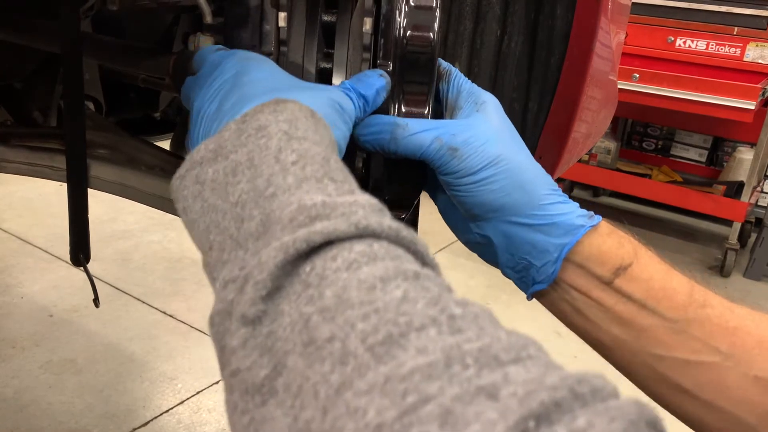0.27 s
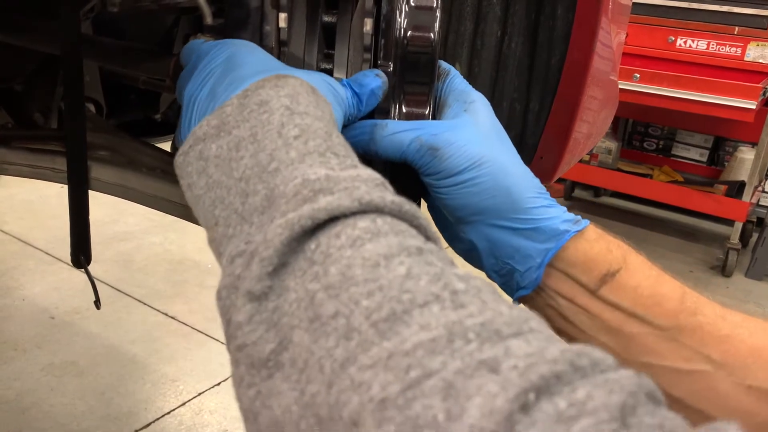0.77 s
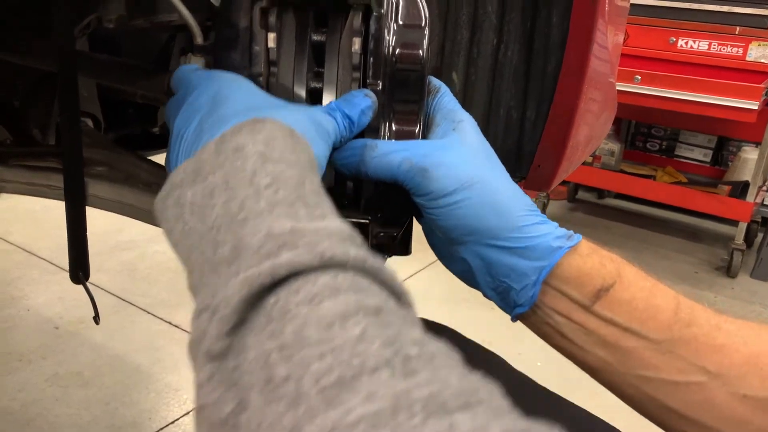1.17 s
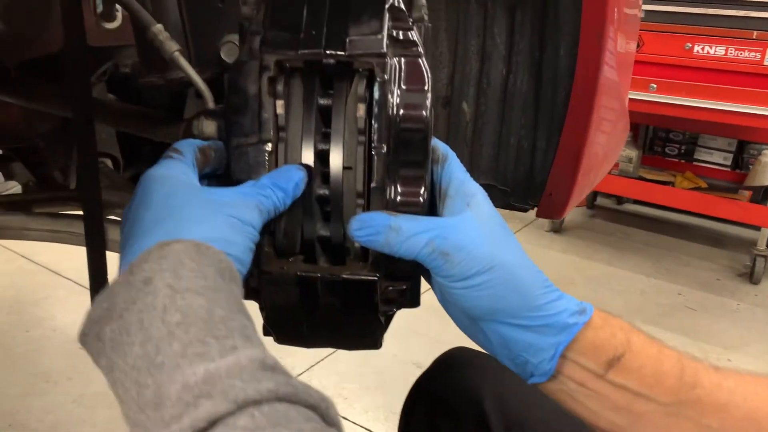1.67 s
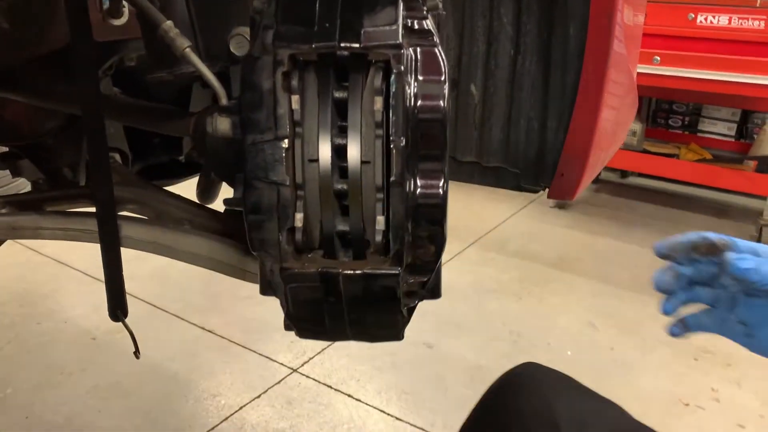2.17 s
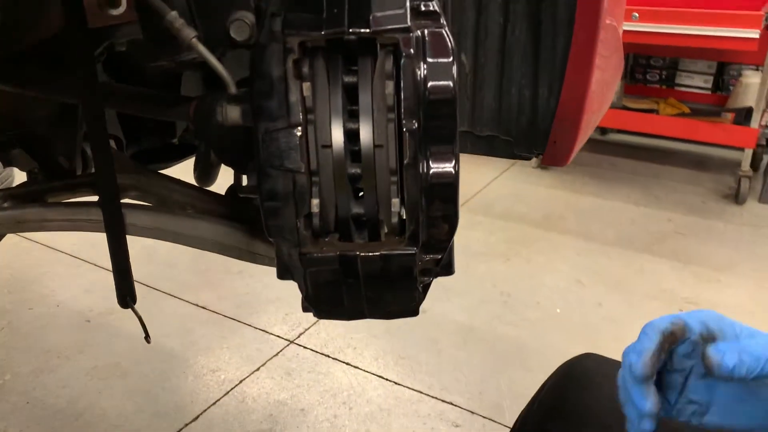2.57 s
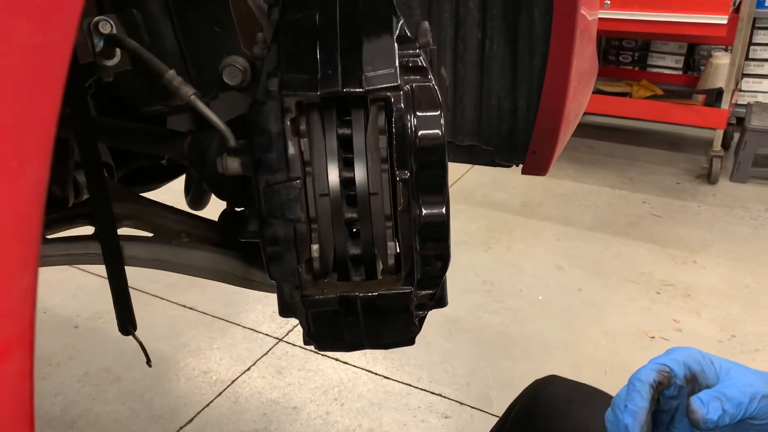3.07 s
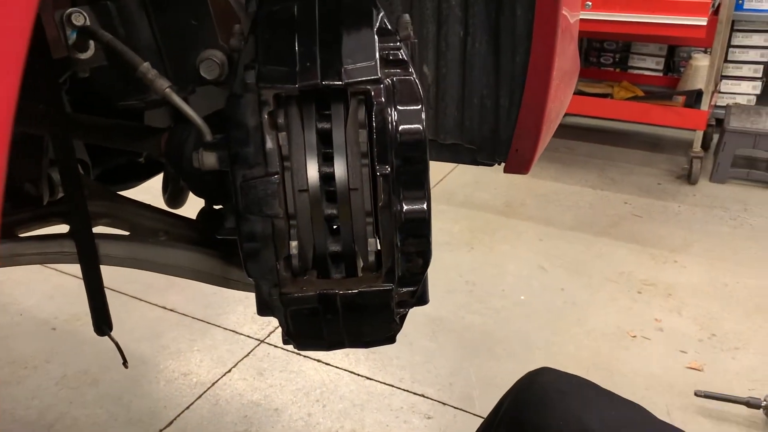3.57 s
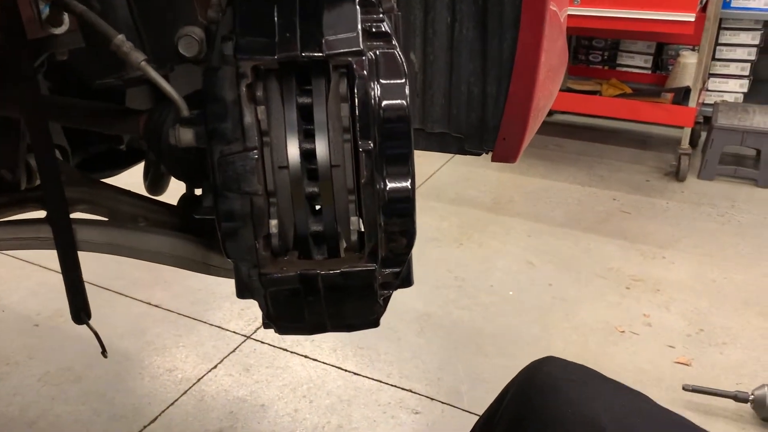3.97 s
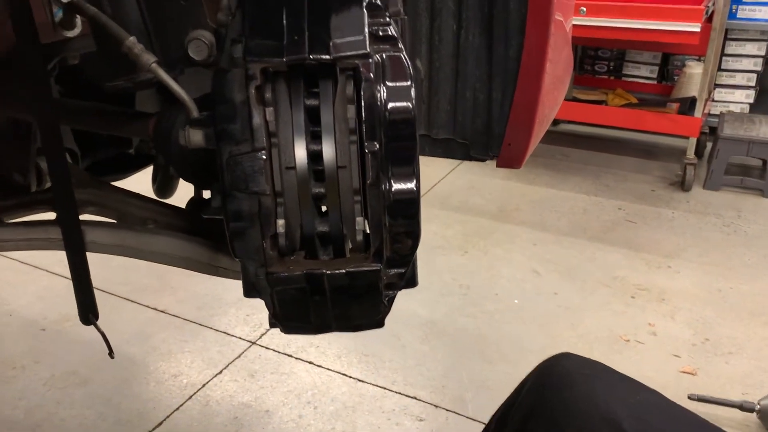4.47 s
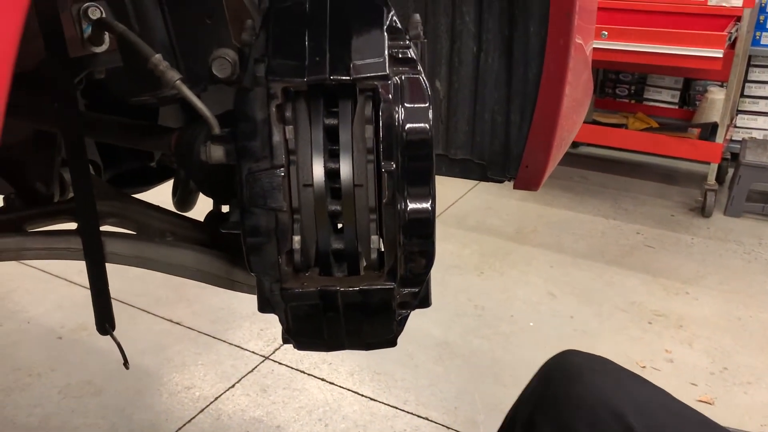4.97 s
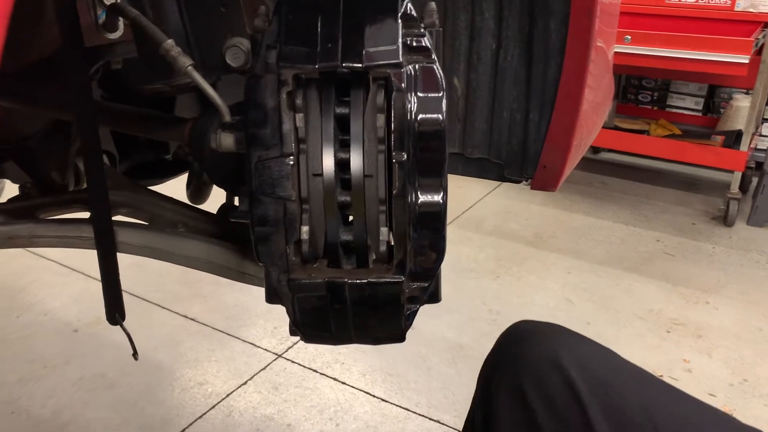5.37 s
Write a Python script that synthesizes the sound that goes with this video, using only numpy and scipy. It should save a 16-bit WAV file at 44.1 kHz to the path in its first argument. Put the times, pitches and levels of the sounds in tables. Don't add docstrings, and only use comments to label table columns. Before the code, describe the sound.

A quiet concrete garage with a faint low hum, heard close through a stereo phone microphone. A low stool rumble fades at the start; light taps come at 0.3 s and a crisper one at 0.66 s. At 1.2 s a glove snaps with a sleeve rub and soft thump. Faint finger snaps near 1.8 s lead into a cluster of low, woody stool bumps from 1.9 to 2.35 s, ending in a cloth scrape. Tiny pin touches tick at 2.8 s, then a loud bright pin knock rings at 3.0 s. A brake pad clacks dully at 3.2 s, its edge bouncing just after. Small ticks and slides pass around 3.8 s. At 4.2 to 4.3 s a clip rattles and snaps under a heavy cloth rub. Sharp steel clicks come at 4.9 s, a bright spring strike with a scrape at 4.97 s, then low thumps until 5.4 s and a last glove snap at 5.47 s.

```python
import sys
import numpy as np
from scipy import signal
from scipy.fft import rfft, irfft
from scipy.io import wavfile
from scipy.ndimage import uniform_filter1d

SR = 44100
rng = np.random.default_rng(int(sys.argv[2]) if len(sys.argv) > 2 else 0)


def elevation(decibels):
    levels = np.asarray(decibels, float)
    return 10 ** (levels / 20)


def unload_wav(signal):
    wavfile.write(
        sys.argv[1],
        SR,
        np.round(np.clip(np.atleast_2d(signal).T, -1, 1) * 32767).astype(np.int16),
    )


N = 247311
F = np.fft.rfftfreq(N, 1 / SR)

REST_DB = {"stool": (-86.5, -116), "sleeve": (-99.5, -86), "glove": (-104, -96.5)}


def band(x, lo_hz, hi_hz, order=2):
    return signal.sosfilt(signal.butter(order, [lo_hz, hi_hz], "bandpass", fs=SR, output="sos"), x)


def unit(x):
    return x / np.sqrt(np.mean(x ** 2))


def over_hz(table, hz):
    table_hz, value = np.transpose(table)
    return np.interp(np.log(np.maximum(hz, 1)), np.log(table_hz), value)


def walk(rate_hz):
    hold = int(SR / rate_hz)
    steps = np.repeat(rng.standard_normal(N // hold + 1), hold)
    return 1.3 * uniform_filter1d(uniform_filter1d(steps, hold), hold)[:N]


def add(track, s, sound):
    i = int(s * SR)
    track[i:i + len(sound)] += sound[:N - i]


def swells(moves, rest_db):
    t = np.arange(0, N + 64, 64) / SR
    s, *db, rise_s, fall_s = np.transpose(moves)[:, :, None]
    rising = (s - t) / np.maximum(rise_s, .01)
    falling = (t - s) / np.maximum(fall_s, .01)
    shape_db = -20 * np.where(t < s, rising, falling)
    gains = []
    for peak_db, rest in zip(db, rest_db):
        power = (elevation(peak_db + shape_db) ** 2).sum(axis=0) + elevation(rest) ** 2
        gains.append(np.interp(np.arange(N) / SR, t, np.sqrt(power)))
    return gains


def grit(lo_hz, hi_hz, per_s, spread_db, flicker_db):
    size = rng.standard_normal(N) * elevation(spread_db * rng.exponential(size=N))
    ticks = (rng.random(N) < per_s / SR) * size
    return unit(band(ticks, lo_hz, hi_hz) * elevation(flicker_db * walk(25.2)))


def in_bands(sound, levels_db, size):
    # lower f/Hz, upper f/Hz
    bands_hz = [(13500, 16100), (1250, 3000), (3000, 7600), (7600, 13500)]
    parts = [band(sound, lo, hi, order=3) for lo, hi in bands_hz]
    return sum(part * elevation(db) / size(part) for part, db in zip(parts, levels_db))


def blows(hits, modes, contact_ms, air_db, crack_db, clatter_db, clatter_t60,
          lift_db=(5, 5, 5), scatter_db=1.5, split=.004):
    out, t = np.zeros(N), np.arange(SR // 3) / SR
    hz, db, t60 = np.transpose(modes)[:, :, None]
    for s, *levels_db in hits:
        touch = rng.standard_normal(2048) * np.exp(-t[:2048] * 1000 / max(contact_ms, .1))
        chance = rng.standard_normal((2, len(modes), 1))
        beat = 1 + .4 * np.cos(2 * np.pi * split * hz * (1 + .3 * chance[0]) * t)
        decay = elevation(db + scatter_db * chance[1] - 60 * t / np.clip(t60, .01, .6))
        rings = beat * np.sin(2 * np.pi * hz * (t + s)) * decay
        clatter = rng.standard_normal(len(t)) * elevation(clatter_db - 60 * t / clatter_t60)
        clatter[0] += elevation(crack_db)
        sound = signal.fftconvolve(clatter, touch / np.linalg.norm(touch))[:len(t)]
        sound += rings.sum(axis=0) * (1 - np.exp(-t * 3000 / max(contact_ms, .1)))
        band_db = [levels_db[-1] + air_db, *np.add(levels_db, lift_db)]
        add(out, s, in_bands(sound, band_db, lambda v: np.abs(v).max()))
    return out


def hum():
    # f/Hz, density/dB
    spectrum = [(26, -16.5), (60, 1), (200, -15.5), (500, -32.5), (2700, -42), (4600, -68), (9000, -43),
                (15800, -50.5)]
    # t/s, level/dB
    throb_swell = [(0.0, -47.5), (0.2, -57.5), (0.98, -50), (1.9, -59.5), (2.37, -42), (2.56, -80),
                   (3.09, -55.5), (3.23, -70), (3.53, -57.5), (4.39, -61.5), (4.48, -75), (4.84, -54.5),
                   (5.34, -51.5), (5.61, -64)]
    noise = irfft(rfft(rng.standard_normal((2, N))) * elevation(over_hz(spectrum, F)) * (F > 20), N)
    s, db = np.transpose(throb_swell)
    throb = unit(band(rng.standard_normal(N), 50.7, 70.3)) * elevation(np.interp(np.arange(N) / SR, s, db) - 4.0)
    return elevation(-59.5) * unit(noise) * elevation(0.21 * walk(1.0)) + throb * np.array([[1], [0]])


def stool():
    # f/Hz, width/Hz, level/dB
    resonances = [(96.4, 24, 0), (157, 40.6, -2.9), (335, 132, -4.5), (500, 166, -3), (734, 252, -4)]
    # peak t/s, rumble level/dB, box level/dB, rise/s and fall/s for 20 dB
    shifts = [(0, -49, -56, .1, 0.29), (.94, -63.5, -63.5, 0.17, 0.27), (1.25, -57, -51.5, 0.12, 0.11),
              (1.45, -63, -65.5, 0.6, 0.3), (1.95, -48.5, -55, 0.019, 0.18), (2.05, -60, -56, 0.19, 0.14),
              (2.3, -45.5, -51, 0.42, 0.29), (2.62, -61.5, -59, 0.73, 0.56),
              (3.03, -55, -49.5, 0.058, 0.15), (3.25, -59, -53.5, 0.15, 0.25),
              (3.8, -71, -66.5, 0.27, 0.71), (4.2, -69, -91, 0.47, 0.47), (4.34, -57.5, -55, 0.11, 0.16),
              (4.86, -72, -57, 0.15, 0.23), (4.97, -51, -55.5, 0.11, 0.65), (5.14, -52, -53.5, 0.11, 0.12),
              (5.28, -42, -50, 0.12, 0.21), (5.5, -69.5, -59.5, 0.096, 0.45)]
    shakes = [elevation(db) * grit(hz - w / 2, hz + w / 2, 900, 1.5, 1.5) for hz, w, db in resonances]
    rumble, box = swells(shifts, REST_DB["stool"])
    return rumble * unit(sum(shakes[:2])) + box * unit(sum(shakes[2:]))


def cloth():
    sleeve_moves = [(0, -69, -70, .1, 0.35), (.82, -68.5, -96, 0.025, 0.7), (1.0, -73, -70.5, 0.2, 4.5),
                    (1.23, -52.5, -58, 0.049, 0.3), (1.45, -65, -100, 0.21, 0.31),
                    (1.56, -64.5, -100.5, 0.11, 0.069), (1.89, -82, -69.5, 0.15, 0.65),
                    (2.26, -65, -68, 1, 0.1), (2.38, -51, -51, 0.14, 0.32), (2.62, -64.5, -82, 0.66, 0.9),
                    (3.11, -59, -61.5, 0.38, 0.39), (3.25, -50, -53.5, 0.071, 0.14),
                    (3.47, -67.5, -69, 0.33, 0.48), (3.81, -100, -56.5, 0.19, 0.21),
                    (4.26, -83, -40, 0.031, 0.16), (4.55, -114, -67.5, 1, 0.26),
                    (4.78, -52.5, -67, 0.094, 0.28), (4.89, -58, -51.5, 0.37, 0.23),
                    (5.05, -63, -63, 0.2, 0.55), (5.2, -78.5, -60.5, 0.15, 0.6),
                    (5.5, -54.5, -54, 0.14, 0.6)]
    glove_moves = [(0, -68, -77, 0.076, 0.34), (1.23, -61, -68, 0.033, 0.15), (1.97, -82, -75.5, 0.06, 1.3),
                   (2.37, -83, -79, 0.092, 0.072), (3.11, -89.5, -59.5, 0.13, 0.082),
                   (3.19, -83, -69, 0.17, 0.03), (3.6, -77.5, -75.5, .5, 0.88),
                   (3.93, -67.5, -77, 0.32, 0.049), (4.39, -80, -60.5, 0.25, 0.036),
                   (4.5, -90, -72, 0.032, 1.1), (4.59, -68.5, -65, 0.12, 0.21),
                   (4.89, -63.5, -47, 0.17, 0.038), (5.2, -68, -71, 0.7, 0.7), (5.61, -86, -62, 0.16, .1)]
    # lower f/Hz, upper f/Hz
    rub_bands_hz = [(1080, 1700), (1700, 4500), (4500, 8000), (8000, 16000)]
    gains = swells(sleeve_moves, REST_DB["sleeve"]) + swells(glove_moves, REST_DB["glove"])
    layers = []
    for gain, (lo, hi) in zip(gains, rub_bands_hz):
        patches = np.array([grit(lo, hi, 6000, 1.7, 2.5) for _ in range(2)])
        layers.append(gain * patches)
    pressure = elevation(1.2 * walk(30))
    return pressure * sum(layers)


def taps():
    # t/s, peak level/dB, f/Hz, width/Hz, t60/s
    tap_events = [(0.306, -53.5, 5740, 3060, 0.093), (0.309, -47.5, 11000, 5000, .03),
                  (.348, -45, 1600, 1850, 0.029), (.349, -52, 6550, 2500, 0.025),
                  (0.347, -53, 11400, 5000, 0.031), (0.542, -67, 1600, 600, 0.037),
                  (.661, -37.5, 3480, 1100, 0.063), (.661, -39.5, 4500, 1000, 0.016),
                  (.661, -45, 7040, 1500, 0.022), (.661, -41, 9900, 4500, 0.029),
                  (0.662, -42, 15000, 1500, 0.022), (0.671, -61, 1310, 400, 0.051),
                  (.811, -60, 1320, 500, .05), (1.606, -44, 2300, 350, 0.026),
                  (2.818, -41, 1690, 415, 0.046), (2.817, -38.5, 2880, 890, 0.053),
                  (2.823, -45, 1640, 300, 0.065), (2.827, -47, 8200, 400, 0.045),
                  (2.839, -40, 2210, 700, 0.035), (2.844, -47, 1910, 700, .03),
                  (2.871, -51, 1690, 400, 0.046), (2.866, -44, 2170, 500, 0.036),
                  (2.866, -42, 3150, 250, 0.076), (2.875, -55.5, 5240, 800, 0.025),
                  (2.882, -44, 2030, 1000, 0.04), (2.892, -54, 2400, 900, .05),
                  (4.219, -49, 720, 300, 0.36), (4.25, -50, 610, 300, 0.27), (4.288, -43, 415, 300, 0.25),
                  (4.288, -25.5, 3060, 2580, 0.033), (4.2925, -43, 2320, 1200, 0.021),
                  (4.2955, -30, 3580, 2400, .035), (4.312, -33, 3120, 1800, .05),
                  (4.209, -54, 6500, 3000, 0.036), (3.791, -42.5, 2400, 900, .05),
                  (1.051, -58, 1680, 250, .08), (2.986, -56, 3100, 500, 0.037),
                  (5.45, -57.5, 1600, 900, .08), (3.219, -39, 3000, 804, .03)]
    out, t = np.zeros(N), np.arange(SR // 8) / SR
    for s, db, hz, width, t60 in tap_events:
        decay = elevation(-60 * t / max(t60, .008))
        burst = rng.standard_normal(len(t)) * decay * (1 - np.exp(-t / 0.0011))
        ring = band(burst, max(hz - width / 2, 100), min(hz + width / 2, 16500))
        add(out, s, elevation(db) * ring / np.abs(ring).max())
    return out


def slides():
    # t/s, rms level/dB of coarse, middle and fine grit, length/ms
    strokes = [(1.199, -65.5, -65, -65.5, 76), (1.763, -84, -72, -64.5, 145), (2.2, -111, -95, -70.5, 133),
               (2.318, -58.5, -49.5, -50, 173), (2.69, -75, -69.5, -74.5, 34), (3.005, -54, -59, -63, 12),
               (3.012, -52.5, -54.5, -57, 59), (3.64, -67, -66.5, -60.5, 63),
               (3.757, -59.5, -57.5, -59, 56), (3.786, -71, -49.5, -43, 50), (3.856, -70.5, -70, -60, 49),
               (4.212, -54.5, -43, -45.5, 44), (4.517, -85, -68, -62, 67), (4.627, -77, -73, -60, 54),
               (4.759, -58, -56, -54, 270), (4.867, -74, -62, -55.5, 9), (4.97, -45.5, -39, -29, 25),
               (5.178, -58.5, -51, -60, 21.6), (5.447, -55.5, -62, -58.5, 128)]
    air_db = -6.5
    out = np.zeros(N)
    rough = grit(500, 17000, 8000, 1.5, .7) * elevation(1.5 * walk(120))
    for s, *levels_db, length_ms in strokes:
        start = int(s * SR)
        u = np.linspace(0, 1, int(length_ms * SR / 1000))
        pressure = np.minimum(u / .2, 1) * np.minimum((1 - u) / .4, 1)
        stroke = rough[start:][:len(u)] * pressure[:N - start]
        add(out, s, in_bands(stroke, [levels_db[-1] + air_db, *levels_db], np.std))
    return out


def glove_snaps():
    # t/s, peak level/dB of thud, knock, sparkle
    snaps = [
        (1.2213, -52, -39, -54),
        (1.7896, -77, -69, -52),
        (1.8335, -54.5, -49, -54.5),
        (1.8934, -56.5, -53, -79),
        (3.629, -65, -56, -56.5),
        (5.4742, -49, -37.5, -47),
    ]
    # f/Hz, level/dB, t60/s
    rubber = [(1300, -16, .02), (3300, -15, .008), (4100, -14, .01), (4800, -18, .01), (9400, -11, .025),
              (15000, -10, .015)]
    return blows(snaps, rubber, contact_ms=2.0, air_db=-2, crack_db=-19.0, clatter_db=-22.0, clatter_t60=0.048)


def bumps():
    # t/s, peak level/dB, f/Hz, t60/s
    bump_events = [(1.237, -31, 210, 0.038), (1.898, -37.5, 157, 0.14), (1.897, -41.5, 285, 0.072),
                   (1.942, -38.5, 122.7, 0.47), (1.941, -41.5, 266, .08), (2.044, -36.5, 200, 0.032),
                   (2.056, -47, 518, 0.07), (2.091, -50, 510, 0.085), (2.125, -40, 512, 0.073),
                   (2.149, -38, 146, 0.2), (2.177, -38.5, 518, 0.06), (2.199, -39, 443, .05),
                   (2.249, -34.5, 152.6, 0.37), (2.255, -42.5, 550, 0.11), (2.3, -44, 157, 0.48),
                   (2.337, -34, 510, 0.051), (1.863, -44.5, 397, 0.071), (4.35, -42, 93.5, 0.17),
                   (5.009, -32.5, 91, 0.092), (5.088, -29, 104, 0.027), (5.076, -44, 512, 0.087),
                   (5.078, -46, 783, 0.093), (5.09, -42.5, 520, 0.043), (5.13, -40.5, 130, 0.17),
                   (5.221, -43, 513, 0.055), (5.249, -33.5, 494, 0.074), (5.25, -35, 345, 0.044),
                   (5.266, -42.5, 538, 0.088), (5.291, -38.5, 97, 0.24), (5.37, -37, 170, .12)]
    out, t = np.zeros(N), np.arange(SR // 4) / SR
    for s, db, hz, t60 in bump_events:
        onset = 1 - np.exp(-(t * hz / 0.47) ** 2)
        ring = np.sin(2 * np.pi * hz * t) * elevation(-60 * t / max(t60, .02)) * onset
        knock = unit(band(rng.standard_normal(len(t)), 120, 620)) * elevation(-18 - 60 * t / 0.17)
        add(out, s, elevation(db) * (ring + knock))
    return out


def pins():
    # t/s, peak level/dB of thud, knock, sparkle
    touches = [
        (2.7717, -69, -43, -37),
        (2.7745, -71, -37.5, -30.5),
        (2.779, -80, -50, -57),
        (2.783, -82, -66, -48),
        (2.8725, -54, -65, -43.5),
    ]
    hits = [
        (3.0167, -45, -37, -14),
        (4.4125, -69, -60, -49),
        (4.5406, -84, -65, -43.5),
    ]
    # f/Hz, level/dB, t60/s
    tip = [(6120, -11, 0.0099), (6970, -2.5, 0.0086), (8280, 8.5, 0.022), (12300, -21, 0.013),
           (15000, -8, 0.03), (15400, -2, .05)]
    body = [(1620, -10, .07), (2090, -18, .05), (3520, -20, .04), (5080, -18, .1), (8190, -8, .11),
            (8420, -6, .04), (11070, -24, .05), (15280, 0, .11), (15560, -5, .18), (15800, -10, .1)]
    out = blows(touches, tip, contact_ms=0.62, air_db=-3, crack_db=11, clatter_db=-21, clatter_t60=0.021)
    out += blows(hits, body, contact_ms=5.3, air_db=1.0, crack_db=7.5, clatter_db=-38.0, clatter_t60=0.037,
                 lift_db=(5, 5, -1))
    return out


def pads():
    # t/s, peak level/dB of thud, knock, sparkle
    knocks = [
        (3.2238, -27, -31, -73),
        (3.2285, -30, -30, -73),
    ]
    hits = [
        (3.2325, -37, -56, -69),
        (3.243, -49, -60, -78),
        (3.259, -60, -61, -81),
        (2.985, -58, -68, -80),
        (5.2996, -52, -62, -63),
        (5.45, -45, -66.5, -66.5),
    ]
    edge_hits = [
        (3.2852, -39, -36, -58),
        (3.2955, -40, -39, -70),
    ]
    # f/Hz, level/dB, t60/s
    plate = [(1394, -11, .035), (1600, -4, .045), (1755, -2, .06), (1922, -6, .07), (2186, -6, .045),
             (2444, -5, .06), (2767, -3, .04), (3128, -1, .04), (3400, -2, .03), (4000, -14, .02),
             (4980, -20, .04), (5400, -17, .025)]
    edge = [(1700, -5, .06), (1900, -4, .08), (2444, -10, .05), (3128, -2, .04), (3400, -5, .03),
            (4323, -9, .12), (5200, -12, .08), (5850, -8, .16), (6500, -9, .03), (8200, -12, .03)]
    out = blows(knocks + hits, plate, contact_ms=4.5, air_db=4, crack_db=2.5, clatter_db=-5, clatter_t60=0.035)
    out += blows(edge_hits, edge, contact_ms=3, air_db=0.5, crack_db=3, clatter_db=-5, clatter_t60=0.04)
    return out


def steel_ticks():
    # t/s, peak level/dB of thud, knock, sparkle
    click = [
        (4.9062, -56, -52, -15),
    ]
    ticks = [
        (3.786, -50, -46, -42),
        (3.7935, -62, -53, -39),
        (4.8933, -71, -60.5, -26.5),
        (4.911, -72, -54, -45),
    ]
    # f/Hz, level/dB, t60/s
    tick_modes = [(3180, -2, 0.051), (8200, -12, 0.055), (9910, -25, .03), (10490, -31, 0.056),
                  (11400, -11.5, 0.017), (12170, -25.5, 0.028), (14900, -10, 0.065), (16000, 7, 0.034)]
    return blows(click + ticks, tick_modes, contact_ms=.3, air_db=6, crack_db=20, clatter_db=-12,
                 clatter_t60=0.05)


def clips():
    # t/s, peak level/dB of thud, knock, sparkle
    hits = [
        (4.2149, -53, -46, -40),
        (4.2247, -55, -49, -35.5),
        (4.2403, -40.5, -49, -70),
        (4.2525, -67, -36.5, -53),
    ]
    snap = [
        (4.2828, -36, -33, -31),
    ]
    # f/Hz, level/dB, t60/s
    clip_modes = [(1583, -22, .1), (2444, -22, .15), (3074, -14, .6), (3590, -8, .07), (3965, -8, .1),
                  (4305, -3, .3), (5150, -16, .3), (6110, -10, .33), (7655, -16, .06), (9065, -10, .05),
                  (10860, -11, .07), (11700, -9, .06), (15550, -10, .1)]
    out = blows(hits, clip_modes, contact_ms=2.3, air_db=-22, crack_db=7, clatter_db=-9, clatter_t60=0.1,
                split=0.0036)
    out += blows(snap, clip_modes, contact_ms=1.2, air_db=-6.0, crack_db=13, clatter_db=-12, clatter_t60=0.07,
                 split=.002)
    return out


def springs():
    # t/s, peak level/dB of thud, knock, sparkle
    hits = [
        (4.9672, -38, -29, -27),
        (4.9828, -49, -34, -29),
        (4.9855, -38, -28, -21.5),
        (5.1853, -48.5, -42, -43),
    ]
    # f/Hz, level/dB, t60/s
    spring_modes = [(2046, -12, .05), (3970, -12, .03), (4900, -13, .022), (6363, -17, .03),
                    (8086, -10, .035), (10860, -6, .05), (11680, 0, .05), (13900, -11, .035),
                    (15500, -8, .03)]
    return blows(hits, spring_modes, contact_ms=1.25, air_db=-1.5, crack_db=16.5, clatter_db=-33.5,
                 clatter_t60=0.057)


def room(x):
    # f/Hz, t60/s
    decay_times = [(300, 0.81), (2000, 0.44), (6000, 0.3), (16000, 0.03)]
    t = np.arange(SR // 2) / SR
    tail = np.zeros((2, len(t)))
    for lo in 100 * 2. ** np.arange(0, 8):
        octave = band(rng.standard_normal((2, len(t))), lo, min(2 * lo, 17000))
        tail += octave * elevation(-60 * t / over_hz(decay_times, 1.12 * lo))
    tail = tail * (1 - np.exp(-(t / 0.00046) ** 2))
    tail = tail / np.sqrt((tail ** 2).sum() / 2)
    return signal.fftconvolve(x[None], tail, axes=1)[:, :N] * elevation(-13.5)


def ports(same, other, side):
    # f/Hz, coherence [0-1]
    likeness = [(60, .98), (130, .96), (300, .7), (700, .45), (3000, .35), (6500, .45), (8000, .97),
                (16000, .98)]
    # f/Hz, level/dB
    balance = [(60, -0.74), (300, -1.5), (700, -1.6), (1290, 0.89), (4400, -0.89), (15000, -3.1)]
    # f/Hz, phase for front
    phase_table = [(0, 0, 0), (5500, 0, 1.9), (8450, .94, 2.94), (8950, 1.06, 3.06), (10700, 1.92, 3.92),
                   (11600, 2.08, 4.08), (13100, 2.92, 4.92), (14100, 3.08, 5.08), (15200, 3.92, 5.92),
                   (18000, 4.1, 6.1)]
    like = np.clip(over_hz(likeness, F), 0, 1)
    hz, *half_cycles = np.transpose(phase_table)
    phase = np.exp(-.5j * np.pi * np.interp(F, hz, half_cycles[side]))
    lead = elevation(over_hz(balance, F) / 2) * phase
    shared = rfft(same)
    opposed = rfft(other) * np.sqrt((1 - like) / (1 + like))
    return irfft(np.array([(shared + opposed) * lead, (shared - opposed) / lead]), N)


def scene():
    front = slides() + bumps() + pins() + steel_ticks() + clips() + springs()
    side = taps() + glove_snaps() + pads()
    spread = hum() + np.array([stool(), stool()]) + cloth() + room(front + side)
    return ports(front, 0 * front, side=0) + ports(side + spread[0], spread[1], side=1)


def low_pass(x):
    return signal.sosfilt(signal.butter(12, 17660, fs=SR, output="sos"), x)


def record(dry):
    top_hz = 15900
    response = elevation(-69.0) + 1 / (1 + (F / top_hz) ** 120)
    mix = irfft(rfft(dry) * response, N)
    return low_pass(mix)


dry = scene()
out = record(dry)
unload_wav(out)
```